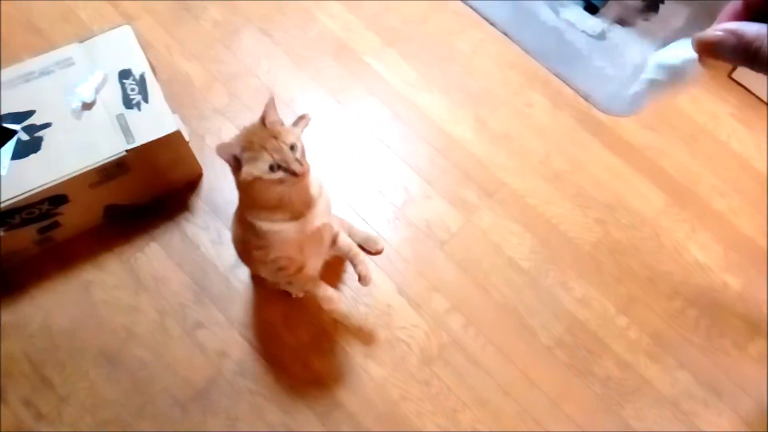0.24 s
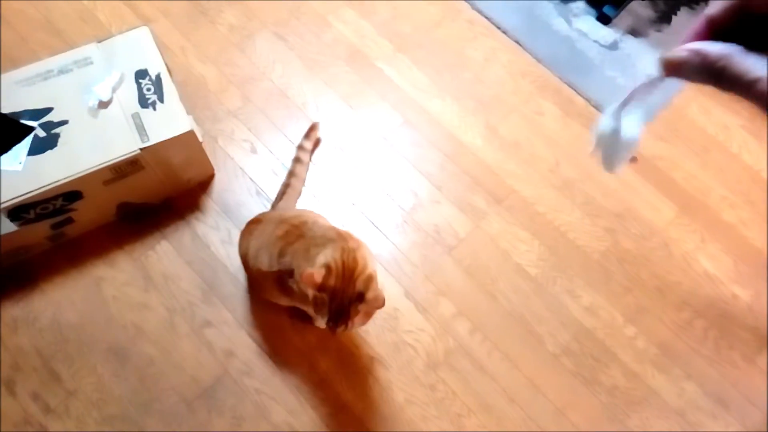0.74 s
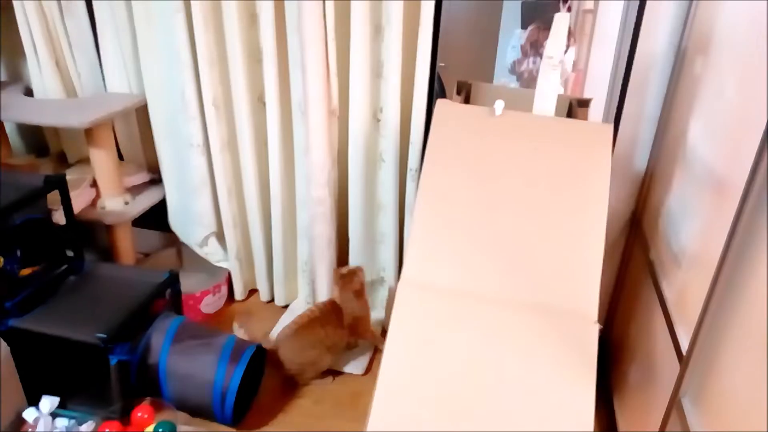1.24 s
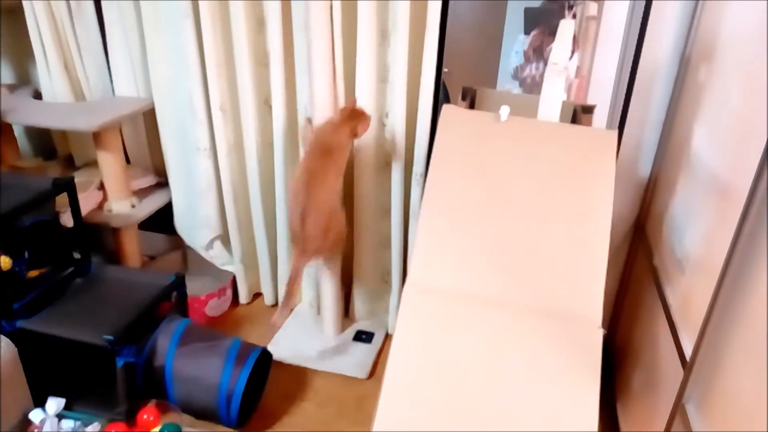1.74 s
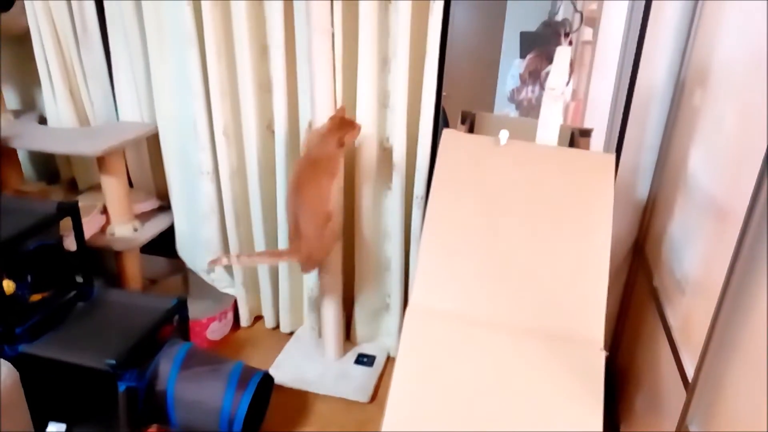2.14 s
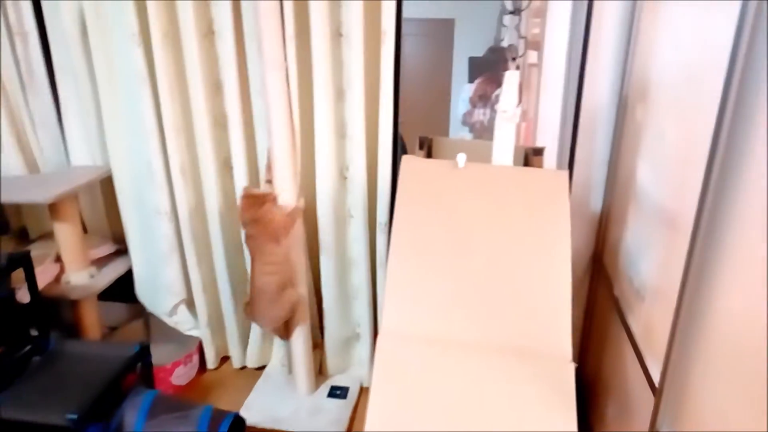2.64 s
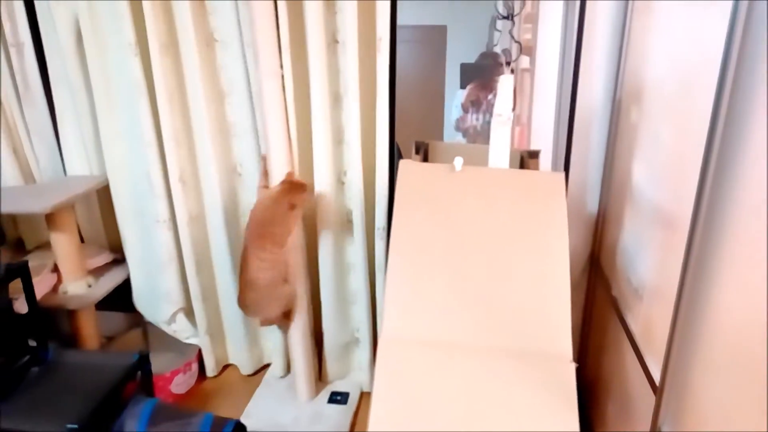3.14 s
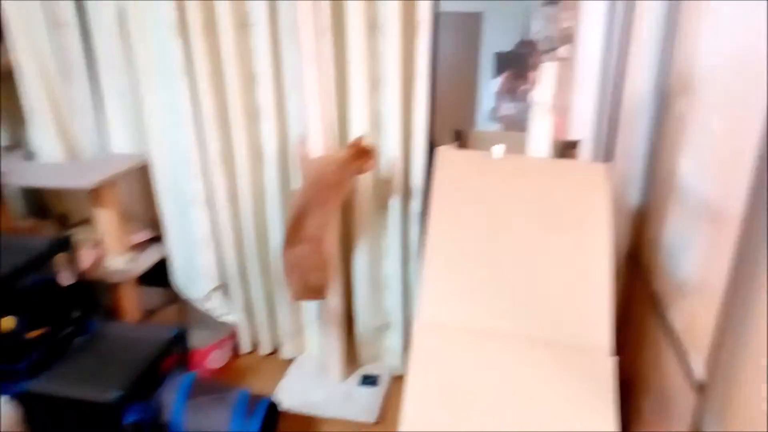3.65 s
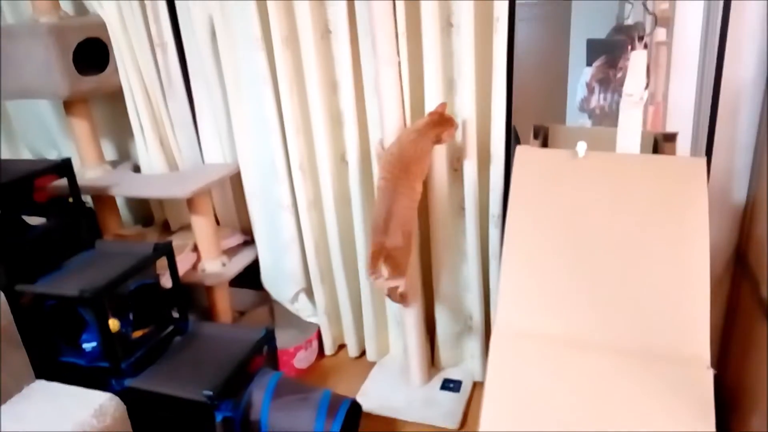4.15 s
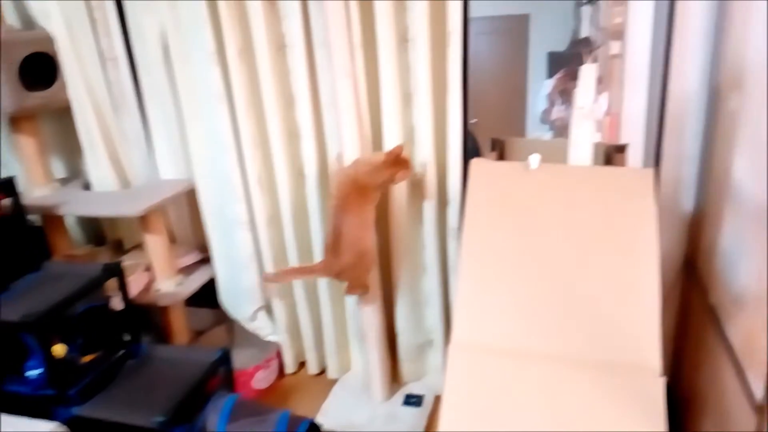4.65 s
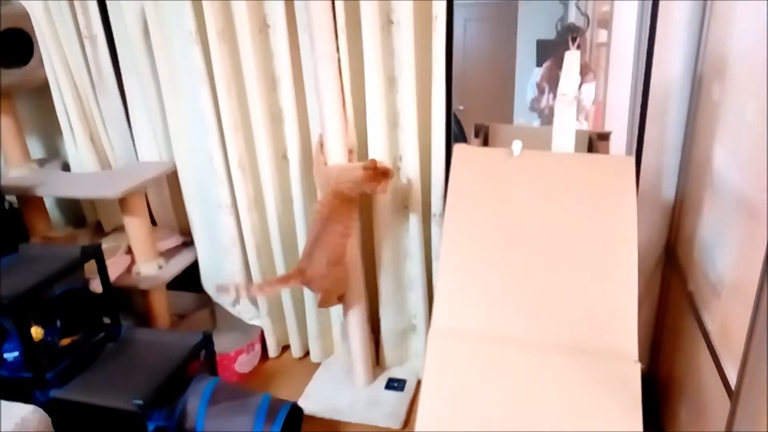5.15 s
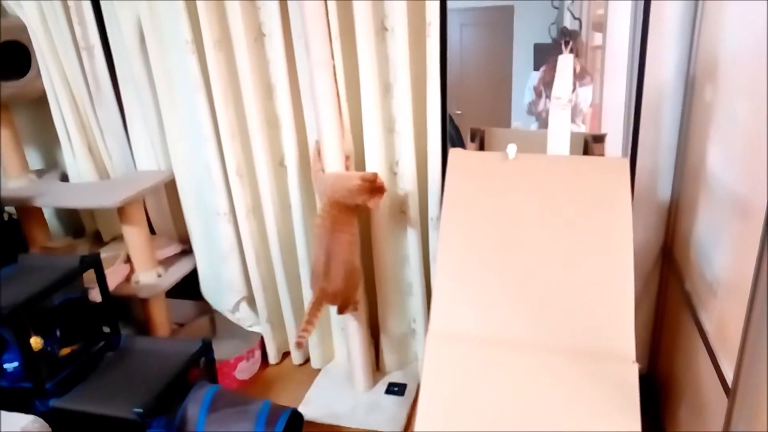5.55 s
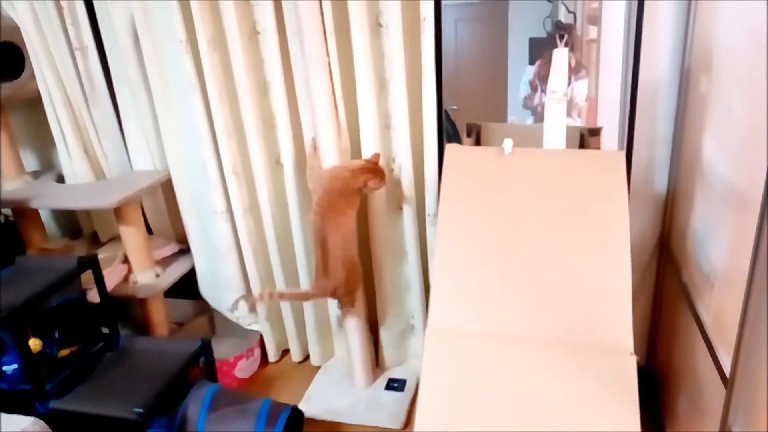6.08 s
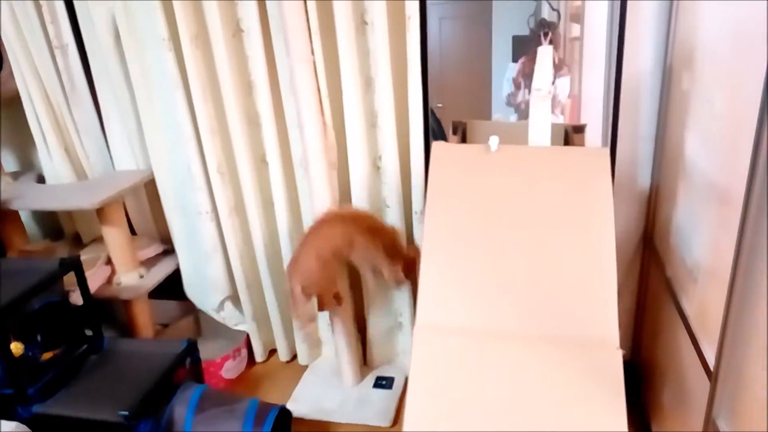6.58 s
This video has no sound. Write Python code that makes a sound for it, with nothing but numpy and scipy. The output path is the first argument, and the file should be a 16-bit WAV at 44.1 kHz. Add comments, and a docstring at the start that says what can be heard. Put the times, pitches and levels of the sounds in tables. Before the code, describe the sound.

A young cat's claws catch and scrabble in irregular clicks up a rope-wound scratching post, with hollow knocks and low thuds, over faint hiss.

```python
"""Soft bumps and swishes over hiss and room tone: a young cat bats at a toy on a wooden floor. A small knock,
then the cat climbs a rope-wound scratching post in a small room and jumps down. Each claw catch is a cluster of
random fibre snaps through filters: they click, knock the hollow post and thud its base. Steps thud the base
too; paws drag in between as shaped noise, and the rope rustles. A ring near 5 kHz colours the clicks and
swishes."""
import sys
import numpy as np
from scipy import signal
from scipy.fft import rfft, irfft, next_fast_len
from scipy.io import wavfile

SR = 44100
rng = np.random.default_rng(int(sys.argv[2]) if len(sys.argv) > 2 else 0)


def persist_wave(psi):
    """Save psi, clipped to +-1, as 16-bit WAV."""
    counts = np.round(np.clip(psi, -1, 1) * 32767).astype(np.int16)
    wavfile.write(sys.argv[1], SR, np.atleast_2d(counts).T)


N = 300629

# --- common
LEVEL_SPAN_S = 0.02  # a hit's dB is its energy spread over this time
TOP_HZ = 15700
HIT_SAMPLES = 16384  # buffer of one hit
HIT_T = np.arange(HIT_SAMPLES) / SR
HIT_HZ = np.fft.rfftfreq(HIT_SAMPLES, 1 / SR)

# Background noise spectra: (frequency [Hz], density [dB per Hz, relative])
HISS_COLOUR = [(1470, -21), (2500, -12.5), (3400, -17), (4050, -9), (4410, -15), (5100, 3), (6170, -8.5),
               (6670, -4), (9780, -2.5), (10600, 1.5), (11400, -5), (15600, -9)]
ROOM_TONE_COLOUR = [(15, -53), (25, -27), (86, -2.5), (262, -5), (450, -6), (991, -12), (1070, -16),
                    (1640, -12.5), (2500, -22), (3250, -19), (5500, -120)]
HISS_DB, ROOM_TONE_DB = -66, -72

# Room decay: (frequency [Hz], t60 [s])
ROOM_T60 = [(120, 0.15), (320, 0.35), (840, 0.32), (2200, 0.3), (5500, 0.31), (12000, 0.34)]
# Echo of the wall beside the post; the scatter is a share of the delay
WALL_DELAY_S, WALL_DB, WALL_SCATTER = 0.0055, -7.5, 0.1265

# Resonances of base and hollow post: (frequency [Hz], width [Hz], level over colour [dB])
BASE_MODES = [(170, 73, 4), (194.5, 15.6, 11)]
POST_MODES = [(611.3, 38, 8.1), (680.5, 5.3, 9.1), (1057, 8.2, 2.9), (1273, 18, 8), (1540, 156, 3.2),
              (1635, 28, 2.2), (1946, 100, 1.1), (2078, 79, 6)]
# Broad rings near 5 kHz and narrow whistling rings on clicks and swishes:
# (frequency [Hz], width [Hz], level over colour [dB])
CLICK_RINGS = [(2770, 25, 2.6), (5020, 210, 4.4), (5010, 210, 12.7), (5286, 490, 12.7), (5740, 200, 4.2),
               (6440, 17, 6.8)]

# Broad colours of base, post, fibre clicks, sliding claw, sliding touch, rubbing paw:
# (frequency [Hz], density [dB per Hz, relative])
THUD_COLOUR = [(20, -35), (50, -20), (80, -6.5), (150, 1), (250, 2.5), (320, -4.5), (420, -16), (700, -6.5),
               (1500, -90.5)]
KNOCK_COLOUR = [(130, -7), (270, -12.5), (400, -10.5), (540, 2), (680, 0.5), (950, 6.5), (1250, -3),
                (1700, 5.5), (2200, -2.5), (2800, -5.5), (4500, -35.5)]
CLICK_COLOUR = [(1200, -16), (2300, -5), (2800, 1), (3400, -3.5), (4100, -4), (5000, 0), (6200, -6.5),
                (7200, -18.5), (10000, -33)]
FIZZ_COLOUR = [(4000, -46), (6500, -6), (8000, -3), (9500, -8), (11000, -7.5), (13000, -30), (15600, -36)]
SWISH_COLOUR = [(1200, -23), (3000, -6.5), (4300, -6), (5200, 0), (6400, -10.5), (8000, -1.5),
                (10500, -9.5), (15600, -31)]
DRAG_COLOUR = [(150, -18), (300, -10), (400, -3), (480, 5), (650, -2.5), (900, 0.5), (1200, -14.5),
               (1700, -10.5), (3000, -18), (6000, -29)]

# Cat hanging on the post: (start [s], end [s])
CLIMB_SPAN = (1.9, 6.2)

# Light brushes of fur, toy and sliding paws: (time [s], length [s], level [dB])
BRUSHES = [(0.003, 0.034, -60), (0.128, 0.025, -62.5), (0.196, 0.03, -64), (1.739, 0.02, -64.5),
           (1.778, 0.04, -54), (1.957, 0.039, -46), (2.219, 0.052, -49), (2.462, 0.016, -52.5),
           (2.834, 0.0073, -57.5), (2.861, 0.0055, -49), (2.908, 0.042, -48.5), (3.373, 0.042, -54),
           (3.502, 0.015, -38), (3.974, 0.013, -58), (4.837, 0.012, -34), (4.938, 0.046, -46.5),
           (5.237, 0.065, -51), (5.466, 0.027, -43), (5.645, 0.0077, -58), (6.717, 0.012, -55)]

# Soft bumps, and short hollow rings after hard catches: (time [s], level [dB], pitch [Hz])
BUMPS = [(0.013, -49, 240), (0.703, -59, 314), (0.727, -62, 245), (0.77, -65, 225), (4.811, -34.5, 606),
         (4.823, -41, 614), (5.893, -51.5, 920), (5.903, -50.5, 1010), (6.165, -54, 560), (6.19, -63, 585),
         (6.568, -40.5, 272)]
BUMP_SWELL_S = 0.0035  # width of the swell before the peak

# Modes of the small hard object knocked: (frequency [Hz], level [dB], t60 [s])
TAP_MODES = [(552, -1.5, 0.097), (1090, -4.5, 0.087), (1160, -7, 0.063), (1560, -10.5, 0.052),
             (1720, -12, 0.05), (2170, -20, 0.04), (2770, -18, 0.035), (3250, -16, .025)]
# The knock and its bounce: (time [s], level [dB])
TAPS = [(1.317, -54), (1.374, -74)]

# Weight landing on a paw and rocking the post: (time [s], level [dB])
STEPS = [(1.775, -56), (1.915, -59), (1.958, -47), (1.986, -44.5), (2.01, -61), (2.116, -47.5),
         (2.325, -41.5), (2.494, -36), (2.64, -43.5), (2.689, -54.5), (2.735, -60), (2.94, -54.5),
         (3.149, -59.5), (3.512, -50.5), (4.08, -62), (4.24, -59.5), (4.317, -58.5), (4.635, -56),
         (4.7, -51.5), (4.848, -38.5), (5.461, -54), (5.877, -52.5), (6.002, -48), (6.429, -43),
         (6.559, -44.5), (6.796, -46.5)]
STEP_S = 0.011  # time for a paw to bear the weight

# Paws and belly dragging along the post: (time [s], length [s], level [dB])
DRAGS = [(1.914, 0.05, -53), (1.988, 0.06, -53), (2.502, 0.035, -44), (2.64, 0.11, -57),
         (2.954, 0.064, -63), (3.653, 0.069, -58.5), (4.12, 0.044, -54.5), (4.302, 0.066, -58.5),
         (4.641, 0.027, -54), (4.838, 0.018, -41), (5.563, 0.043, -60.5), (6.138, 0.081, -59.5),
         (6.57, 0.017, -49)]

# Claw catches: (time [s], length [s], click level [dB], grip = knock over clicks [dB], pitch of the spot [Hz])
CLAWS = [(1.909, 0.0031, -57.5, 11, 597), (1.9135, 0.002, -58, 2, 1620), (1.93, 0.0056, -54, -5, 570),
         (1.96, 0.0031, -51, 0, 2300), (1.97, 0.001, -54.5, 6.5, 714), (1.987, 0.0096, -51.5, 1, 594),
         (2.098, 0.0012, -54, -8, 820), (2.118, 0.0012, -44.5, -9.5, 820),
         (2.1268, 0.00083, -46.5, -3.5, 645), (2.1313, 0.0025, -47, -4, 825),
         (2.2142, 0.003, -55.5, 2.5, 670), (2.328, 0.0073, -43.5, -3, 2830), (2.338, 0.0024, -45, -1, 1430),
         (2.345, 0.012, -41.5, -3.5, 574), (2.367, 0.01, -47.5, -9, 303), (2.426, 0.0085, -50.5, 1.5, 1600),
         (2.493, 0.0084, -34, 0.5, 614), (2.531, 0.0033, -32, -8.5, 900),
         (2.538, 0.00092, -41.5, -0.5, 1810), (2.666, 0.022, -48.5, -5, 300),
         (2.712, 0.071, -52.5, -8, 408), (2.902, 0.021, -51.5, 0, 690), (2.943, 0.003, -48, 1, 700),
         (3.051, 0.079, -52, -8.5, 393), (3.432, 0.068, -51, -6.5, 2290), (3.493, 0.01, -48, -3, 2700),
         (3.504, 0.004, -34.5, -6.5, 1690), (3.51, 0.008, -39, 3, 687), (3.527, 0.0032, -35.5, -6, 1890),
         (3.53, 0.003, -44.5, 3, 775), (4.048, 0.0077, -50.5, -1, 2640), (4.075, 0.039, -46.5, -3.5, 614),
         (4.091, 0.0025, -55, 2, 675), (4.3, 0.032, -56.5, -1.5, 980), (4.495, 0.027, -54, -4, 990),
         (4.54, 0.025, -46, -8, 2370), (4.57, 0.0017, -44, -8, 2320), (4.583, 0.0069, -51, 2, 1670),
         (4.6308, 0.0036, -40, -5.5, 2000), (4.7, 0.016, -53.5, 2.5, 970),
         (4.727, 0.004, -40.5, -3.5, 1610), (4.7495, 0.0026, -45.5, -10, 910),
         (4.786, 0.0013, -35.5, -14, 1630), (4.7893, 0.0041, -24, -14.5, 1610),
         (4.7932, 0.0016, -35, -2, 1750), (4.799, 0.0011, -28, -10, 2730), (4.809, 0.0048, -39.5, 5, 1100),
         (4.839, 0.0014, -39, -1.5, 1580), (4.8484, 0.00085, -42.5, 3, 2750),
         (4.852, 0.0029, -37, -0.5, 610), (4.861, 0.0043, -42.5, -2.5, 790),
         (5.2614, 0.004, -48, -17, 1510), (5.407, 0.0086, -58, 3, 1670), (5.4623, 0.0035, -39, -13, 1501),
         (5.543, 0.0028, -41, -11, 1880), (5.729, 0.032, -54.5, -2.5, 790), (5.872, 0.00099, -49, 5.5, 870),
         (5.874, 0.001, -43.5, -3, 1900), (5.879, 0.0011, -45.5, -5.5, 1880),
         (6.003, 0.011, -45, -2.5, 2150), (6.213, 0.023, -62.5, -1.5, 1670),
         (6.366, 0.025, -57.5, 3.5, 420), (6.427, 0.0014, -43, -14, 1940), (6.4311, 0.0022, -34, -2, 1900),
         (6.4365, 0.0041, -39.5, -3.5, 1750), (6.5614, 0.0047, -33.5, -2, 820),
         (6.566, 0.0028, -42.5, -4.5, 2000), (6.792, 0.0059, -41.5, 0, 1310)]
CLUMP_S, CLUMP_DB = 0.001717, 4.5  # fibres give way in clumps: spacing, spread
LEAD_S, LEAD_DB = 0.007, -8  # a soft crackle leads into each catch, this early, at this level over the clicks
POST_DETUNE, POST_SCATTER_DB = 0.0151, 5  # spread of mode pitch (share) and mode level per catch
SPOT_WIDTH, SPOT_WET = 0.16, 0.25  # bandwidth as share of pitch; share reaching the room
WET_DB, WET_DB_PER_GRIP_DB = 1.5, 0.38  # shallow snaps at the rope's surface are heard more directly
THUD_LAG_S = 0.00509  # the heavy base answers late
THUD_DB, THUD_DB_PER_GRIP_DB = -14, 0.85  # thud over clicks
FIZZ_DB, USUAL_STROKE_S = -19, 0.01  # fizz over clicks, at this stroke length
FIZZ_DB_PER_DOUBLING = 2  # longer strokes slide more
# Click tilt: a shallow grip snaps thin fibres and loses lower range; a pull above the reference restores it
TILT_DB_PER_GRIP_DB, TILT_DB_PER_PULL_DB, PULL_REF_DB = 1.18, 0.2048, -62.5
# Where that tilt acts: (frequency [Hz], share of the tilt)
TILT_SHARE = [(3300, 0.76), (4900, 0.071)]


def amp(db):
    """Decibels to gain."""
    return 10 ** (np.asarray(db) / 20)


def along(points, hz):
    """Interpolate (Hz, value) points on a log frequency axis."""
    f, v = np.transpose(points)
    return np.interp(np.log(hz + 1), np.log(f), v)


def at_level(x, db):
    """Scale a hit to its level."""
    return x * amp(db) / np.sqrt(np.sum(x ** 2) / (LEVEL_SPAN_S * SR) + 1e-30)


def add(track, s, x):
    """Mix x into the track from time s on."""
    start = int(np.clip(round(s * SR), 0, N - 1))
    track[start:start + len(x)] += x[:N - start]


def body(colour, modes=()):
    """Minimum-phase, causal response of a broad colour with resonances on it."""
    peaks = sum(amp(db) ** 2 / (1 + (2 * (HIT_HZ - hz) / width) ** 2) ** 0.98 for hz, width, db in modes)
    cepstrum = irfft(np.log(amp(along(colour, HIT_HZ)) * np.sqrt(1 + peaks)))
    # fold the cepstrum onto positive time
    cepstrum[1:HIT_SAMPLES // 2] *= 2
    cepstrum[HIT_SAMPLES // 2 + 1:] = 0
    return np.exp(rfft(cepstrum))


def resonance(hz, width_hz):
    """One damped mode, unit gain at its pitch."""
    return 1j * HIT_HZ * width_hz / (hz ** 2 - HIT_HZ ** 2 + 1j * HIT_HZ * width_hz)


def lumps(spacing_s, depth_db):
    """Gain wandering at random between points a fixed spacing apart."""
    points_db = np.clip(rng.standard_normal(HIT_SAMPLES), -2, 2)
    return amp(depth_db * np.interp(HIT_T / max(spacing_s, 1e-4), np.arange(HIT_SAMPLES), points_db))


def stroke(length_s, rise):
    """Contact force: builds over a share of the stroke, then lets go."""
    u = HIT_T / max(length_s, 1e-3)
    return (1 - np.exp(-u / rise)) * np.exp(-u ** 2)


def snaps(size, per_second, spread_db):
    """Fibres let go at random moments, with uneven force and either sign."""
    chance, force, side = rng.random(size), rng.standard_normal(size), rng.standard_normal(size)
    return (chance < per_second / SR) * amp(spread_db * np.clip(force, -2, 2)) * np.sign(side)


def tear(length_s):
    """Spectrum of one run of fibres snapping in clumps, with a little friction noise."""
    fibres = snaps(HIT_SAMPLES, per_second=1600, spread_db=3.5)
    fibres = fibres + 0.11 * rng.standard_normal(HIT_SAMPLES)
    return rfft(fibres * lumps(CLUMP_S, CLUMP_DB) * stroke(length_s, rise=0.92))


def room(wet_db, build_up_s=0.0021, uneven_db=3.5):
    """Direct path, near wall and a fresh, uneven decaying tail, since the cat keeps moving."""
    hz, t, z = signal.stft(rng.standard_normal(HIT_SAMPLES), SR, nperseg=256)
    decay = amp(-60 * t / along(ROOM_T60, hz)[:, None])
    tail = signal.istft(z * decay, SR, nperseg=256)[1][:HIT_SAMPLES]
    tail *= (1 - np.exp(-(HIT_T / build_up_s) ** 2)) * lumps(0.002, uneven_db)
    delay_s = WALL_DELAY_S * (1 + WALL_SCATTER * rng.standard_normal())
    wall = amp(WALL_DB) * np.exp(-2j * np.pi * HIT_HZ * delay_s)
    return 1 + wall + amp(wet_db) * rfft(tail / np.linalg.norm(tail))


def steady(colour, db):
    """Stationary noise of a given spectrum and RMS level: room tone or hiss."""
    x = irfft(rfft(rng.standard_normal(N)) * amp(along(colour, np.fft.rfftfreq(N, 1 / SR))), N)
    return amp(db) * x / np.std(x)


def rope(level_db, per_second):
    """Sparse fibre ticks: the rope rustles faintly while it carries the cat's weight."""
    start, end = CLIMB_SPAN
    click = body(CLICK_COLOUR, CLICK_RINGS)
    knock = amp(-3.5) * body(KNOCK_COLOUR, POST_MODES)
    thud = amp(7.0) * body(THUD_COLOUR, BASE_MODES)
    tick = irfft((click + knock + thud) * room(wet_db=8.5))
    ticks = signal.fftconvolve(snaps(int((end - start) * SR), per_second, spread_db=2.0), tick)
    track = np.zeros(N)
    add(track, start, amp(level_db) * ticks / np.std(ticks))
    return track


def tap(chatter_s=0.0092, chatter=0.14):
    """A light knock chatters briefly, rings in a few short modes and bounces once."""
    ring = sum(amp(db - 60 * HIT_T / t60) * np.sin(2 * np.pi * hz * HIT_T) for hz, db, t60 in TAP_MODES)
    track = np.zeros(N)
    for s, db in TAPS:
        rattle = tear(chatter_s)
        contact = 1 + chatter * rattle / np.std(rattle)
        add(track, s, at_level(irfft(rfft(ring) * contact * room(wet_db=3.5)), db))
    return track


def bumps(ring_s=0.0048):
    """Soft bumps and short hollow rings: a sine swells, dies off within a few cycles, and the room carries it on."""
    track = np.zeros(N)
    lead_s = 2 * BUMP_SWELL_S
    t = HIT_T - lead_s
    envelope = np.exp(-np.where(t < 0, (t / BUMP_SWELL_S) ** 2, t / ring_s))
    for s, db, hz in BUMPS:
        push = envelope * np.sin(2 * np.pi * hz * t) * lumps(0.00325, depth_db=3.5)
        heard = irfft(rfft(push) * room(wet_db=0.0, build_up_s=0.0051))
        add(track, s - lead_s, at_level(heard, db))
    return track


def brushes():
    """Something slides by without catching: a short, soft swish of noise."""
    track = np.zeros(N)
    colour = body(SWISH_COLOUR, CLICK_RINGS)
    for s, length_s, db in BRUSHES:
        force = stroke(length_s, rise=0.069) * lumps(CLUMP_S, depth_db=-1.0)
        swish = rfft(rng.standard_normal(HIT_SAMPLES) * force)
        add(track, s, at_level(irfft(swish * colour * room(wet_db=2)), db))
    return track


def steps():
    """The cat throws its weight onto a paw, and the post thuds on its base."""
    track = np.zeros(N)
    thud = body(THUD_COLOUR, BASE_MODES)
    for s, db in STEPS:
        heard = irfft(tear(STEP_S) * thud * room(wet_db=5.5, build_up_s=0.012))
        add(track, s, at_level(heard, db))
    return track


def drags(catch_db=5):
    """A paw rubs jerkily over the rope, and the hollow post answers with a dull scrape."""
    track = np.zeros(N)
    colour = body(DRAG_COLOUR)
    for s, length_s, db in DRAGS:
        force = lumps(0.00431, catch_db) * stroke(length_s, rise=0.04)
        rub = rfft(rng.standard_normal(HIT_SAMPLES) * force)
        add(track, s, at_level(irfft(rub * colour * room(wet_db=1.5)), db))
    return track


def loaded_post():
    """Post response with mode pitches and levels shifted by the cat's weight and hold."""
    shifts = rng.standard_normal((len(POST_MODES), 2))
    modes = [(hz * (1 + POST_DETUNE * a), width, db + POST_SCATTER_DB * b)
             for (hz, width, db), (a, b) in zip(POST_MODES, shifts)]
    return body(KNOCK_COLOUR, modes)


def claws(spot_db=10.5, shared=0.27):
    """A soft crackle, then the claw tears the rope: base and post answer, fine fibres click, sliding fizzes."""
    track = np.zeros(N)
    thud, click, fizz = body(THUD_COLOUR, BASE_MODES), body(CLICK_COLOUR, CLICK_RINGS), body(FIZZ_COLOUR)
    for s, length_s, click_db, grip_db, hz in CLAWS:
        knock_db = click_db + grip_db  # a deeper grip passes more of the pull to the post
        fizz_db = click_db + FIZZ_DB + FIZZ_DB_PER_DOUBLING * np.log2(length_s / USUAL_STROKE_S)
        thud_db = click_db + THUD_DB + THUD_DB_PER_GRIP_DB * grip_db
        space = room(wet_db=WET_DB + WET_DB_PER_GRIP_DB * grip_db, build_up_s=0.0058)
        knock, tugs = loaded_post(), tear(length_s)

        # thin fibres also snap without shaking the post
        fine = shared * tugs + tear(length_s)
        tilt_db = TILT_DB_PER_GRIP_DB * min(grip_db, 0) + TILT_DB_PER_PULL_DB * (click_db - PULL_REF_DB)
        fine = fine * amp(tilt_db * along(TILT_SHARE, HIT_HZ))
        slide = rfft(rng.standard_normal(HIT_SAMPLES) * stroke(length_s + 0.0012, rise=0.31))

        # each spot favours its own pitch, heard most on the direct path
        spot = amp(spot_db) * resonance(hz, SPOT_WIDTH * hz) * (1 + SPOT_WET * (space - 1))
        add(track, s, at_level(irfft(tugs * knock * (space + spot)), knock_db))
        add(track, s, at_level(irfft(fine * click * space), click_db))
        add(track, s, at_level(irfft(slide * fizz * space), fizz_db))
        add(track, s + THUD_LAG_S, at_level(irfft(tugs * thud * space), thud_db))

        crackle = tear(2 * LEAD_S) * (click + amp(1.5) * (knock + fizz)) * space
        add(track, s - LEAD_S, at_level(irfft(crackle), click_db + LEAD_DB))
    return track


def scene():
    """Room tone and hiss, small noises, then the cat on the post; one channel."""
    background = steady(ROOM_TONE_COLOUR, ROOM_TONE_DB) + steady(HISS_COLOUR, HISS_DB)
    small_noises = tap() + bumps() + brushes()
    climb = rope(level_db=-69.5, per_second=160) + steps() + drags() + claws()
    return (background + small_noises + climb)[None]


def record(dry):
    """Brick-wall band limit: nothing passes from TOP_HZ up."""
    m = next_fast_len(N + SR // 2)
    passband = np.fft.rfftfreq(m, 1 / SR) < TOP_HZ
    return irfft(rfft(dry, m) * passband, m)[..., :N]


dry = scene()
out = record(dry)
persist_wave(out)
```